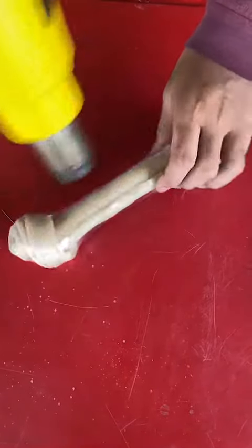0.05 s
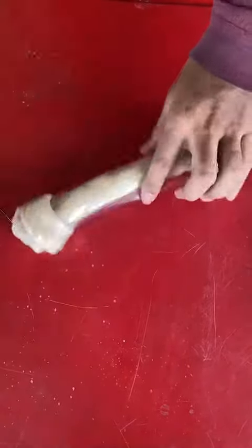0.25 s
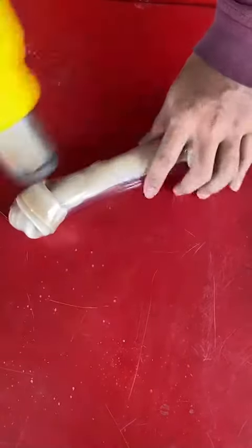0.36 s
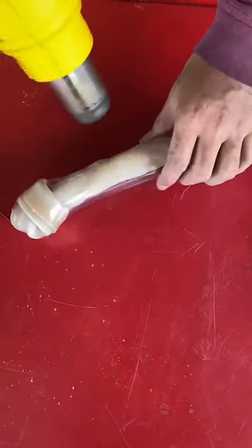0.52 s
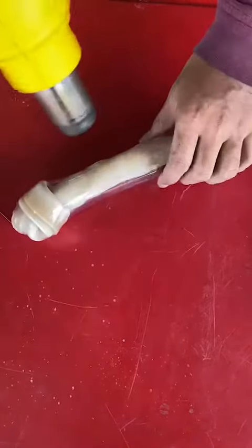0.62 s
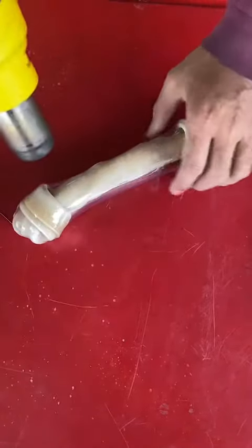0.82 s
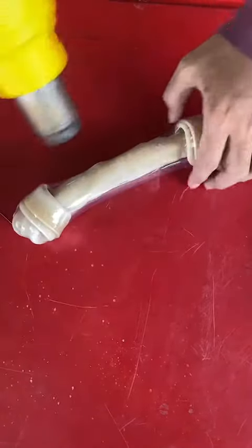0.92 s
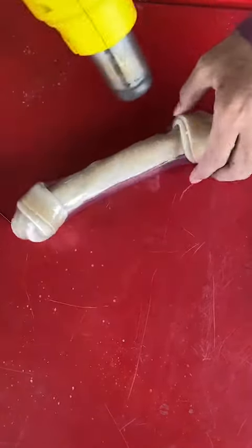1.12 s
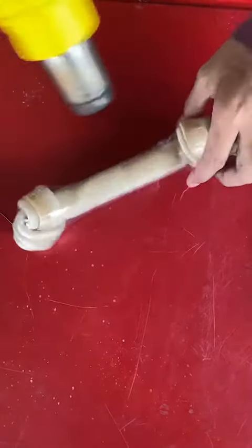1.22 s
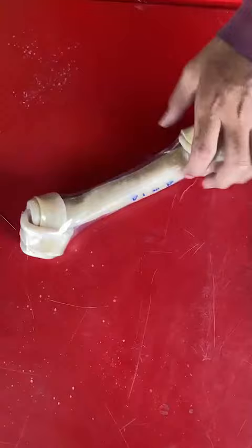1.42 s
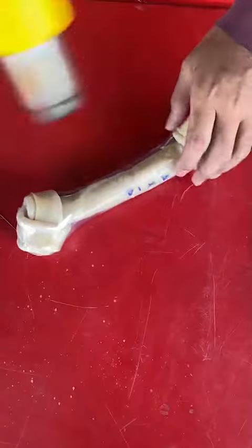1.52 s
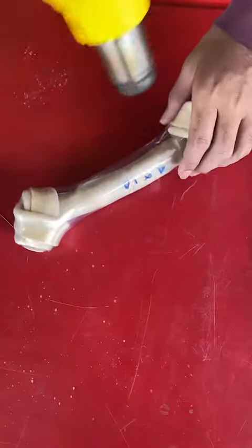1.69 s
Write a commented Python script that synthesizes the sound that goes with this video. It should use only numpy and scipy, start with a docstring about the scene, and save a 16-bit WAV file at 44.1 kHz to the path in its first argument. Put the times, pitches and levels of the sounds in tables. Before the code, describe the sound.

A heat gun hisses with a thin wavering whine throughout, close up indoors; early on a hard dog chew cracks sharply onto a sheet-metal table, which booms and rings, then softer dull knocks follow near the end.

```python
"""The wavering hiss and whine of a moving heat gun run throughout, close to a phone, a little above a
sheet-metal table; a soft knock is already ringing at the start. The hiss arrives again off the table top,
0.19 to 0.55 m later in path, over a low hum of the sheet. A hard chew is turned over and knocks on the
sheet: a falling chirp and sharp crack, then a boom whose lows swell late and stay. Two microphone ports
hear it, with a phase lag that mostly grows with pitch."""
import sys
import numpy as np
from scipy import signal
from scipy.fft import rfft, irfft, next_fast_len
from scipy.io import wavfile
from scipy.ndimage import uniform_filter1d, map_coordinates

SR = 44100
rng = np.random.default_rng(int(sys.argv[2]) if len(sys.argv) > 2 else 0)


def inscribe(sig):
    """Save sig as 16-bit PCM at rate SR to the path in sys.argv[1].

    A 1-D sig is mono; a 2-D sig holds one channel per row.
    Samples are clipped to [-1, 1] before scaling.
    """
    pcm = np.round(np.clip(np.atleast_2d(sig).T, -1, 1) * 32767)
    wavfile.write(sys.argv[1], SR, pcm.astype(np.int16))


def volts_from_decibels(level):
    """Turn decibel levels (scalar or array-like) into linear amplitude factors."""
    exponent = np.asarray(level, float) / 20
    return 10 ** exponent


N = 77175  # samples, 1.75 s

# hiss of fan and jet before nozzle and gun level: pitch_hz, level_db (per third octave)
JET_HISS = [(250, -66.5), (450, -68), (630, -52), (850, -54.5), (1100, -45.5), (1350, -64.5), (1750, -52.5),
            (2300, -55), (2800, -53.5), (3500, -59), (4200, -58), (4800, -62), (5600, -64.5), (7000, -59),
            (8600, -66), (10500, -64.5), (13000, -67), (15500, -72)]
# resonances of housing and nozzle: pitch_hz, width_hz, gain_db
NOZZLE_RESONANCES = [(795, 40, 10.5), (1059, 51, 5.5), (1677, 230, 5), (2380, 90, 3.5), (3430, 450, 3),
                     (3890, 46, 5), (4490, 40, 5.5), (8600, 100, 14), (9770, 180, -0.5), (10400, 170, 9)]
# motor and fan tones before the gun level: pitch_hz, level_db (rms)
FAN_TONES = [(807.5, -59), (2422, -67), (3472, -66), (3833, -66), (4603, -69), (8624, -76)]
# the gun as it moves: start_s, level_db, extra_path_m (by way of the table top)
GUN_MOVES = [(0, 3.5, 0.19), (.2, 4, 0.27), (.55, 0, 0.21), (.9, 1.5, 0.203), (1.149, 1, .21),
             (1.3, 2, 0.31), (1.52, 2, 0.297), (1.62, -1, 0.27), (1.75, -0.5, 0.55)]
# colour of the hum of the sheet in the air stream: pitch_hz, relative_level_db (per third octave)
RUMBLE_COLOUR = [(30, -51), (45, -14.5), (62, -4), (85, -1.5), (110, -2.5), (150, -8), (200, -12.5),
                 (320, -11.5), (450, -20)]
# level of that hum: start_s, level_db
RUMBLE_LEVEL = [(0, -41.5), (.13, -41), (.2, -41), (.6, -42), (.78, -42), (.95, -42.5), (1.15, -47.5),
                (1.3, -39.5), (1.6, -37.5), (1.75, -42.5)]
# knocks of the chew: start_s, boom_db, crack_db, contact_cutoff_hz (harder = higher), extra_bass_db,
# pulse_db (peak of the bending wave)
KNOCKS = [(-.06, -29.5, -36, 250, -0.5, -40), (0.083, -25.5, -28, 475, -15, -42),
          (.1988, -12.5, -12.5, 10900, 0.5, -9.5), (1.235, -35.5, -45, 400, -3, -34),
          (1.332, -22, -21.5, 700, 5.5, -26), (1.359, -30.5, -32, 600, 5, -27),
          (1.377, -24.5, -30, 350, 2, -23.5)]
# first crack, relative to each knock: pitch_hz, relative_level_db (per third octave)
CRACK_COLOUR = [(300, -12.5), (800, -18.5), (1500, -18), (4000, -19), (9000, -14.5), (15000, -26)]
# strong modes of the sheet, relative to each knock: pitch_hz, relative_level_db, t60_s
SHEET_MODES = [(63, -8, 1.6), (105, -2, .9), (156, -1, .6), (194, -5, 1.3), (255, -6, .6), (309, -9, .5),
               (354, -5, .35), (458, -13, .4), (547, -15, .5), (813, -17, .5), (1039, -17, .5)]
# dense ringing of sheet and room: pitch_hz, relative_level_db (per third octave), t60_s, swell_s
DENSE_BOOM = [(46.4, -23, 1.2, 0.08), (108, -10, 1.15, 0.015), (185, -8.5, 0.88, 0.013),
              (350, -8, .85, 0.007), (510, -18, 0.93, 0.012), (930, -14.5, 0.75, 0.0011),
              (2310, -19, 0.66, 0.00081), (4950, -22, 0.55, 0.0028), (8800, -15, 0.23, .002),
              (15000, -41, 1.05, 0.0022)]
# likeness of the noise at left and right: pitch_hz, correlation (0-1)
LIKENESS = [(100, .9999), (200, .997), (350, .95), (700, .8), (1100, .86), (1450, .99), (1900, .97),
            (2800, .5), (3700, .85), (4050, .93), (4500, .65), (4950, .95), (5600, .99), (6000, .8),
            (6500, .99), (8200, .99), (9000, .8), (9700, .995), (11500, .995), (11900, .75), (12500, .98),
            (16000, .97)]
# microphone ports: pitch_hz, left_lead_rad, left_minus_right_db
PORTS = [(0, 0, 0), (400, -.15, 0), (800, -.35, -1), (1500, 0, 0), (1900, 0, 0), (2200, .3, -1),
         (2750, 1.4, -2.5), (3400, .5, -1.5), (4000, .25, 0), (4600, .3, -2.5), (5000, .1, 0),
         (5600, .1, 0), (6450, 3.1, 0), (8250, 3.2, 0), (9600, 6.24, 0), (11550, 6.32, 0), (12550, 9.38, 0),
         (14800, 9.6, 0), (15300, 12.5, 0)]


def at(table, hz, col=1):
    """Column of a table at hz, on a log pitch axis."""
    a = np.array(table, float)
    return np.interp(np.log(hz), np.log(a[:, 0]), a[:, col])


def walk(rate):
    """Random levels held 1 / rate s and slewed twice; spread near 1."""
    hold = int(SR / rate)
    steps = np.repeat(rng.standard_normal(N // hold + 1), hold)
    return 1.3 * uniform_filter1d(uniform_filter1d(steps, hold), hold)[:N]


def thirds(lo, hi):
    """Yields (Hz, left-right noise of rms 1) in overlapping third-octave bands."""
    n = next_fast_len(N)
    f = np.maximum(np.arange(n // 2 + 1) * SR / n, 1)
    like = np.clip(at(LIKENESS, f), 0, 1)
    mid, side = rfft(rng.standard_normal((2, n))) * np.sqrt([1 + like, 1 - like])
    left_right = np.array([mid + side, mid - side])
    band_count = int(3 * np.log2(hi / lo)) + 1
    for hz in lo * 2 ** (np.arange(band_count) / 3):
        shape = np.cos(np.pi / 2 * np.clip(3 * np.log2(f / hz), -1, 1))
        band = irfft(shape * left_right, n)[:, :N]
        yield hz, band / np.sqrt(np.mean(shape ** 2) * 2)


def jet_hiss():
    """Turbulent air: flickering noise bands coloured by resonances of housing and nozzle."""
    swell_db, flicker_db = 1.28, 0.63
    hiss, swell = 0, swell_db * walk(2.52)
    for hz, noise in thirds(198.7, 16000):
        hiss = hiss + volts_from_decibels(at(JET_HISS, hz) + swell + flicker_db * walk(20.45)) * noise
    f = np.arange(N // 2 + 1) * SR / N
    nozzle_db = sum(db / (1 + (2 * (f - hz) / width) ** 2) for hz, width, db in NOZZLE_RESONANCES)
    return irfft(rfft(hiss) * volts_from_decibels(nozzle_db), N)


def fan_tones():
    """Motor and fan whine: sines that share one pitch wobble and flicker separately in level."""
    wobble_share, flicker_db = .003, 2.5
    wobbled_s = np.cumsum(1 + wobble_share * walk(6)) / SR
    whine = 0
    for hz, db in FAN_TONES:
        tone = np.sin(2 * np.pi * (hz * wobbled_s + rng.random()))
        whine = whine + np.sqrt(2) * volts_from_decibels(db + flicker_db * walk(11.1)) * tone
    return whine


def table_mirror(direct, t, extra_path_m):
    """The table top returns the gun's sound later by the extra path, weaker in bass and top treble."""
    lo_hz, hi_hz, mirror_db = 1200, 6000, -6
    late = (t - extra_path_m / 343) * SR  # read position in samples; sound travels at 343 m/s
    mirror = np.array([map_coordinates(side, [late], mode="mirror") for side in direct])
    f = np.arange(N // 2 + 1) * SR / N
    reflect = f ** 2 / (f ** 2 + lo_hz ** 2) / (1 + (f / hi_hz) ** 2)
    return volts_from_decibels(mirror_db) * irfft(rfft(mirror) * reflect, N)


def heat_gun(t):
    """Jet hiss and wavering fan tones, heard directly and again via the table top."""
    direct = jet_hiss() + fan_tones()
    start_s, level_db, extra_path_m = np.array(GUN_MOVES).T
    mirror = table_mirror(direct, t, np.interp(t, start_s, extra_path_m))
    return (direct + mirror) * volts_from_decibels(np.interp(t, start_s, level_db))


def rumble(t):
    """The air stream keeps the sheet humming: low noise bands that flicker separately."""
    flicker_db = 2.5
    hum = 0
    for hz, noise in thirds(28.54, 500):
        hum = hum + volts_from_decibels(at(RUMBLE_COLOUR, hz) + flicker_db * walk(9.87)) * noise
    return hum * volts_from_decibels(np.interp(t, *np.array(RUMBLE_LEVEL).T))


def crack_cutoff(cut):
    """Cut-off in Hz of the crack, which is brighter than the boom of the same contact."""
    return 5 * cut


def bending_pulses():
    """First wave of each knock: in a bending sheet highs outrun lows, giving a short falling chirp."""
    lag_s, lo_hz, hi_hz = 0.002958, 90, 2570  # lag at 1 kHz
    tilt = 0.24  # amplitude falls as Hz to this power
    n = next_fast_len(2 * N)
    f = np.arange(n // 2 + 1) * SR / n
    dispersion = np.exp(-4j * np.pi * lag_s * np.sqrt(1000 * f))
    chirp = dispersion / (1 + (lo_hz / (f + 1)) ** 2) / (f + 1) ** tilt
    out = 0
    for s, _, _, cut, _, pulse_db in KNOCKS:
        wave = chirp / (1 + (f / min(crack_cutoff(cut), hi_hz)) ** 2) ** 2
        peak = np.abs(irfft(wave, n)).max()
        out = out + volts_from_decibels(pulse_db) * wave / peak * np.exp(-2j * np.pi * f * s)
    return irfft(out, n)[:N]


def struck(t, s, db, cut, bass_db, hz, t60, swell):
    """Envelope of one knock at hz: swell, decay, duller for a soft contact."""
    bass_hz = 148
    hand_down_s, hand_t60_share = 1.3, .75  # a hand on the sheet shortens later rings
    age = np.maximum(t - s, 0)
    t60 = t60 * (hand_t60_share if s > hand_down_s else 1)
    colour = volts_from_decibels(bass_db / (1 + (hz / bass_hz) ** 2)) / (1 + (hz / cut) ** 2)
    return colour * volts_from_decibels(db - 60 * age / t60) * (1 - np.exp(-age / max(swell, 1e-4)))


def crack_and_boom(t):
    """Noise bands carry the short crack and the dense ringing of sheet and room, added in power."""
    crack_t60_s, crack_swell_s = 0.056, .0003
    out = np.zeros((2, N))
    for hz, noise in thirds(40.75, 16000):
        t60, swell = at(DENSE_BOOM, hz, col=2), at(DENSE_BOOM, hz, col=3)
        power = 0
        for s, boom_db, crack_db, cut, bass_db, _ in KNOCKS:
            boom = struck(t, s, boom_db + at(DENSE_BOOM, hz), cut, bass_db, hz, t60, swell)
            crack = struck(t, s, crack_db + at(CRACK_COLOUR, hz), crack_cutoff(cut), 0, hz,
                           crack_t60_s, crack_swell_s)
            power = power + boom ** 2 + crack ** 2
        out += np.sqrt(power) * noise
    return out


def sheet_modes(t):
    """Each knock rings the strong modes of the sheet as decaying sines of chance size and sign."""
    modes_db, scatter_db, flicker_db = -8, 1.5, 3
    out = np.zeros(N)
    chance = rng.standard_normal((len(KNOCKS), len(SHEET_MODES), 2))
    flicker = [volts_from_decibels(flicker_db * walk(25.46)) for _ in SHEET_MODES]
    for (s, boom_db, _, cut, bass_db, _), rows in zip(KNOCKS, chance):
        for (hz, db, t60), (size, sign), beat in zip(SHEET_MODES, rows, flicker):
            ring = np.sign(sign) * beat * np.sin(2 * np.pi * hz * (t - s))
            envelope = struck(t, s, boom_db, cut, bass_db, hz, t60, at(DENSE_BOOM, hz, col=3))
            out += volts_from_decibels(modes_db + db + scatter_db * size) * ring * envelope
    return out


def knocks(t):
    """Each knock sends a bending wave, cracks, leaves a dense boom and rings the sheet's modes."""
    return bending_pulses() + crack_and_boom(t) + sheet_modes(t)


def scene():
    """Gun and hum of the sheet, with the knocks over them."""
    t = np.arange(N) / SR
    return heat_gun(t) + rumble(t) + knocks(t)


def band_limit(x):
    """A steep low-pass at the top of the band."""
    return signal.sosfilt(signal.butter(12, 16650, fs=SR, output="sos"), x)


def record(dry):
    """Two ports, each taking half the phase and level difference, and a top cut."""
    top_hz = 15750
    n = next_fast_len(N + 4096)
    f = np.arange(n // 2 + 1) * SR / n
    port_hz, lead_rad, difference_db = np.array(PORTS).T
    half = np.exp(.5j * np.interp(f, port_hz, lead_rad)) * volts_from_decibels(np.interp(f, port_hz, difference_db) / 2)
    ports = np.array([half, 1 / half])
    mix = irfft(rfft(dry, n) * ports * (f < top_hz), n)[:, :N]
    return band_limit(mix)


dry = scene()
out = record(dry)
inscribe(out)
```